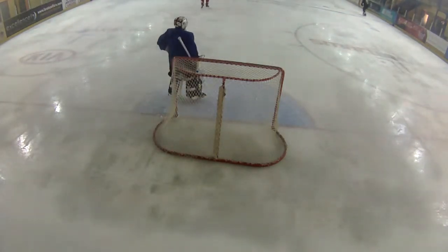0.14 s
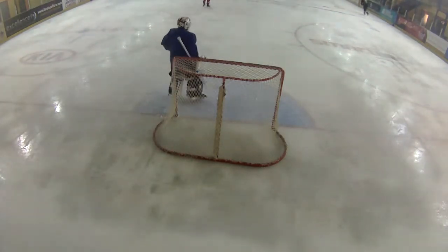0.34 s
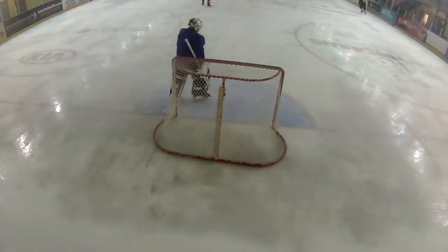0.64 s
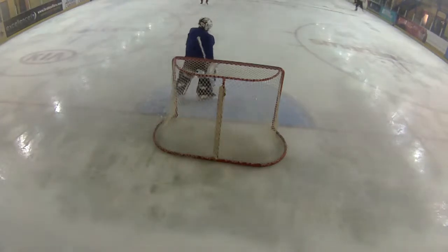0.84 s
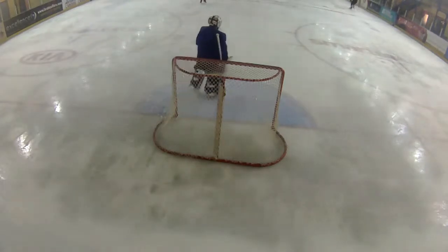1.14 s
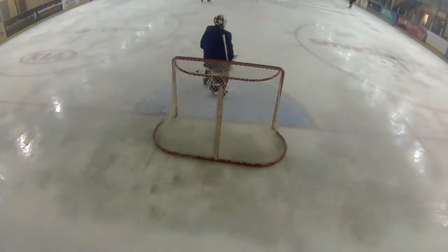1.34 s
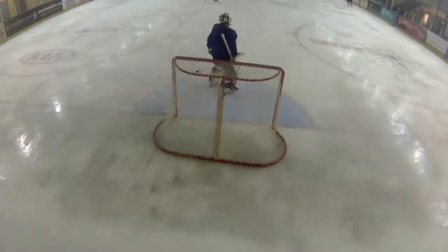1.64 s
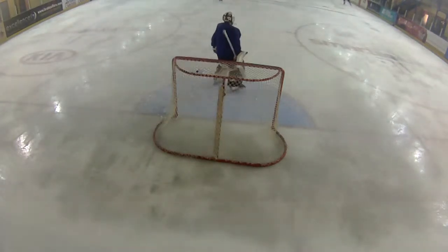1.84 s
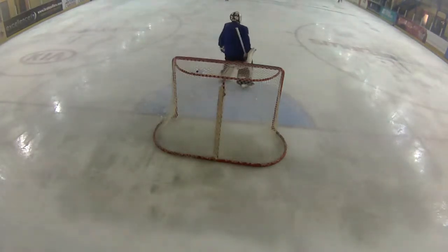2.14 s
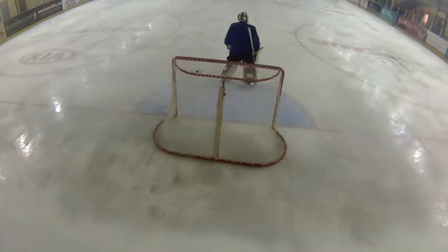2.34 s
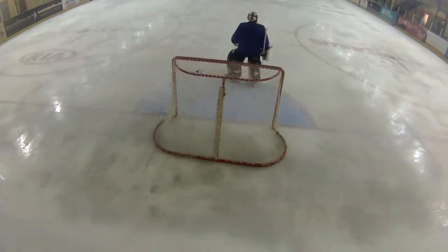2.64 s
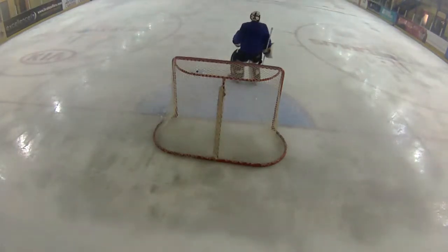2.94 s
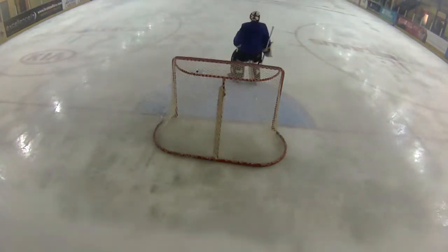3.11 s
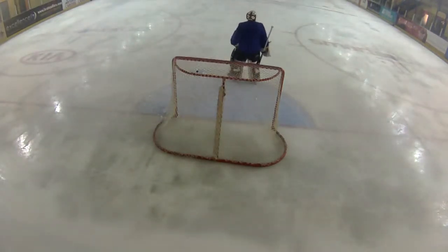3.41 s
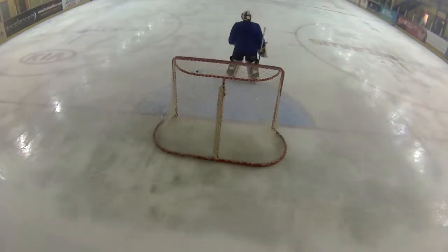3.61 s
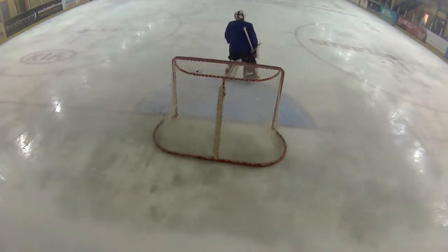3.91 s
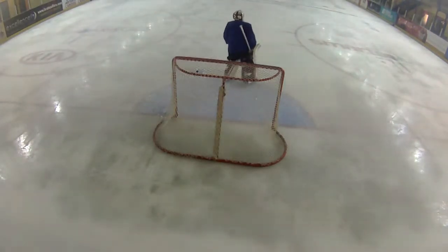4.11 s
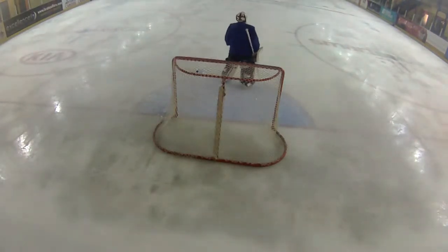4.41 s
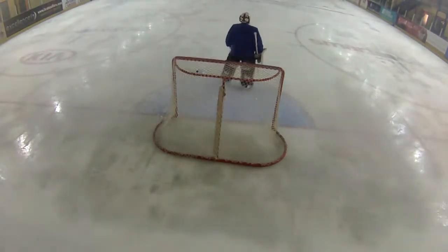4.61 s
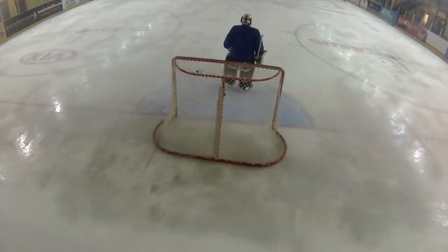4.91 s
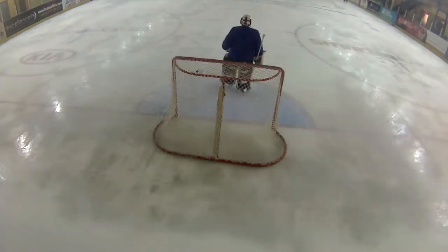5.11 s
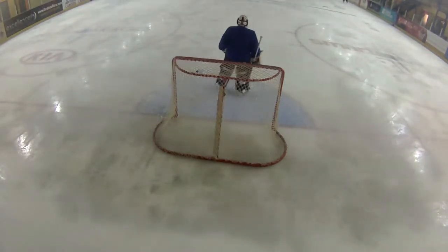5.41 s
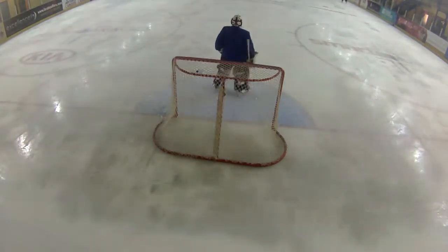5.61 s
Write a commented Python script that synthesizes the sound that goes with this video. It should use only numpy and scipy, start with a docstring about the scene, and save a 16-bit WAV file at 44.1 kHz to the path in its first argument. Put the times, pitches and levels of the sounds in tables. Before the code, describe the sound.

Skate blades scrape and hiss in swelling strokes on rink ice, with clusters of sharp hard clacks echoing over a low ventilation rumble.

```python
"""A first clack rings out over a low rumble and faint skating: hockey practice in an indoor rink.
Blades scrape in swelling strokes made of random ice clicks and noise, split into bands with their own levels.
Sticks, puck and skates clack as cracks plus decaying tones, and the hall rings on after them.
Both pass a sealed plastic case that favours about 2-4 kHz and adds its own resonances.
Filtered noise makes the ventilation and the dull roar of play; sines make a fan drone and a brief hum."""
import sys
import numpy as np
from scipy import signal
from scipy.fft import rfft, irfft
from scipy.io import wavfile
from scipy.ndimage import uniform_filter1d

SR = 44100
rng = np.random.default_rng(int(sys.argv[2]) if len(sys.argv) > 2 else 0)


def persist_wave(psi):
    """Save psi, clipped to +-1, as 16-bit WAV."""
    counts = np.round(np.clip(psi, -1, 1) * 32767).astype(np.int16)
    wavfile.write(sys.argv[1], SR, np.atleast_2d(counts).T)


N = 253575
TIME = np.arange(N) / SR


def from_db(db):
    """Decibels to gain."""
    return 10 ** (np.asarray(db) / 20)


def rms_one(x):
    """Scale to unit power."""
    return x / np.sqrt(np.mean(x ** 2) + 1e-20)


def peak_one(x):
    """Scale to unit peak."""
    return x / np.abs(x).max()


def unit_energy(h):
    """Scale an impulse response so that white noise keeps its power through it."""
    return h / np.sqrt(np.sum(h ** 2))


def band(x, low_hz, high_hz, order=6):
    """Band-pass without phase shift, so that neighbouring bands add up evenly."""
    sections = signal.butter(order, [low_hz, high_hz], "band", fs=SR, output="sos")
    return signal.sosfiltfilt(sections, x)


def drift(rate_hz):
    """Smooth random curve of spread 1 that moves mostly slower than rate_hz."""
    hz = np.fft.rfftfreq(N, 1 / SR)
    spectrum = rfft(rng.standard_normal(N)) / (1 + (hz / rate_hz) ** 2)
    return rms_one(irfft(spectrum, N))


def response(points, modes=(), size=8192):
    """Causal impulse response of unit energy from a spectrum with resonances on top."""
    hz = np.fft.rfftfreq(size, 1 / SR) + 1  # the offset avoids log(0)
    point_hz, point_db = np.transpose(points)
    db = np.interp(np.log(hz), np.log(point_hz), point_db)
    for centre_hz, width_hz, boost_db in modes:
        db = db + boost_db / (1 + (2 * (hz - centre_hz) / width_hz) ** 2)
    # folding the cepstrum onto positive times gives minimum phase: no sound before its cause
    cepstrum = irfft(np.log(from_db(db)))
    index = np.arange(size)
    positive = (index > 0) & (index < size // 2)
    return unit_energy(irfft(np.exp(rfft(2 * cepstrum * positive))))


def through(x, h):
    """Filter by an impulse response, keeping the length."""
    return signal.fftconvolve(x, h)[:len(x)]


def tone(hz, waver_rad):
    """A sine of unit power whose phase wanders by about waver_rad."""
    return np.sqrt(2) * np.sin(2 * np.pi * hz * TIME + waver_rad * drift(3.5))


def swell(start_s, attack_s, hold_s, release_db_per_s):
    """Gain that rises, holds and dies away."""
    t = TIME - start_s
    rise = np.clip(t / attack_s, 0, 1)
    return rise * from_db(-release_db_per_s * np.maximum(t - attack_s - hold_s, 0))


# Colour of the ventilation, also used for the low noise of the channels.
# Each row: frequency in Hz, relative density in dB per Hz.
VENT_COLOUR = [(10, 5), (25, -5.5), (40, -3.5), (60, -8), (100, -9.5), (200, -14), (400, -18.5), (800, -26),
               (2000, -55)]


def ventilation(level_db=-55.5):
    """Turbulent air rumbles steadily: noise filtered to a low, dark colour."""
    return from_db(level_db) * rms_one(through(rng.standard_normal(N), response(VENT_COLOUR)))


# Slow fades of the ventilation's deep drone.
# Each row: time in seconds, level in dB before the drone's overall trim.
FAN_FADES = [(0, -55), (.6, -63), (1.5, -48.5), (2.0, -58.5), (3.1, -63.5), (4.7, -56), (5.2, -53),
             (5.75, -48)]


def fan_drone(hz=29.3, waver_rad=0.8, trim_db=-6.5):
    """The fan is one deep sine with a wandering phase and an uneven level."""
    time_s, level_db = np.transpose(FAN_FADES)
    return from_db(np.interp(TIME, time_s, level_db) + trim_db) * tone(hz, waver_rad)


# A hollow low hum passing through the hall.
# The one row: centre in seconds, time from centre to 1/e of the gain in seconds, pitch in Hz, level in dB.
HALL_HUM = (1.17, .16, 83, -62)


def hum(waver_rad=0.47):
    """A low wavering sine that rises and falls in a bell-shaped swell."""
    centre_s, length_s, hz, level_db = HALL_HUM
    bell = np.exp(-((TIME - centre_s) / length_s) ** 2)
    return from_db(level_db) * bell * tone(hz, waver_rad)


# Colour of the roar of play. Each row: frequency in Hz, relative density in dB per Hz.
ROAR_SPECTRUM = [(80, -8.5), (200, -4.5), (500, -4.5), (800, -4), (1200, -8), (3000, -51)]
# Dull booms of the hall. Each row: start in seconds, level in dB.
HALL_BOOMS = [(0.41, -57), (2.56, -59)]


def roar(steady_db=-66.5, attack_s=0.054, hold_s=0.18, release_db_per_s=14):
    """Dull filtered noise roars steadily, and each boom adds its power to it."""
    power = from_db(steady_db) ** 2
    for start_s, level_db in HALL_BOOMS:
        boom = from_db(level_db) * swell(start_s, attack_s, hold_s, release_db_per_s)
        power = power + boom ** 2
    return np.sqrt(power) * through(rng.standard_normal(N), response(ROAR_SPECTRUM))


def rink(x, build_s=0.14, t60_s=2.8):
    """Reflections from far walls build up slowly and die away over seconds."""
    envelope = (1 - np.exp(-TIME / build_s)) * from_db(-60 * TIME / t60_s)
    return through(x, unit_energy(rng.standard_normal(N) * envelope))


# What the case wall lets through. Each row: frequency in Hz, relative gain in dB.
WALL_GAIN = [(100, -27), (820, -33), (880, -15.5), (1300, -13), (1650, -9), (1900, 1), (2400, 4.5),
             (3000, -2), (3600, -4), (4400, -15.5), (5000, -22), (5800, -33), (6800, -42.5), (7500, -44),
             (16000, -52)]
# Resonances and small dips of the case. Each row: centre in Hz, width in Hz, boost in dB.
CASE_RESONANCES = [(903, 39, 7.5), (1036, 50, 6), (1195, 71, 7.5), (1520, 64, 1.5), (1592, 21, 6.5),
                   (1728, 29, 6.5), (1855, 47, 6.5), (2150, 110, -1.5), (2302, 85, 6.5), (2455, 65, -1.5),
                   (2657, 76, 4.5), (2800, 67, -0.5), (2930, 50, 4.5), (3533, 53, 7.5), (4010, 310, -3.5),
                   (4200, 380, 8), (6540, 320, 6.5)]


def plastic_case():
    """The wall passes mainly the upper middle, and the closed case colours it with its modes."""
    return response(WALL_GAIN, CASE_RESONANCES)


# Sticks, puck and skates striking.
# Each row: time in seconds, peak in dB, pitch in Hz, time for the ring to fall 60 dB in seconds.
BLOWS = [ (0.2511, -29.5, 2460, .006), (0.294, -28, 2490, 0.039), (0.4388, -17, 2700, 0.012),
         (0.4435, -33, 3500, 0.019), (0.459, -24.5, 5070, 0.01), (0.46, -22, 2840, 0.041),
         (0.4833, -23, 2540, .013), (0.485, -22.5, 1890, 0.074), (0.5285, -42, 2670, 0.0045),
         (0.5494, -32, 2570, 0.0039), (0.5810, -20, 2570, .04), (1.4420, -30, 3340, .016),
         (1.4660, -37, 4970, .014), (1.7728, -30.5, 3230, 0.023), (1.807, -36, 3000, 0.0072),
         (1.8300, -36, 5460, .008), (2.4452, -26, 3250, 0.031), (2.5550, -30, 2320, 0.021),
         (2.6023, -19.5, 2390, 0.021), (2.647, -25, 1835, 0.074), (2.7067, -38, 2330, 0.024),
         (3.0639, -35, 2600, .01), (3.602, -33, 2800, .02), (4.6330, -22.5, 2400, 0.041),
         (4.6430, -20.5, 2650, 0.021), (4.6632, -26, 1900, 0.016), (4.6882, -18, 2200, 0.017),
         (4.6945, -17.5, 1850, 0.021), (4.7237, -21.5, 3760, .012), (4.7325, -18.5, 2330, 0.0086),
         (4.7499, -23, 3100, 0.0062), (4.7642, -20.5, 2150, 0.015), (5.0370, -27.5, 2020, .012),
         (5.1105, -25, 1900, 0.0096), (5.5214, -27, 2330, 0.033), (5.548, -35, 4200, 0.0094),
         (5.557, -33, 6250, 0.011), (5.5800, -26, 2180, .03), (5.6220, -26, 2430, 0.023),
         (5.688, -21, 3400, 0.0083), (5.7170, -23, 4700, .014)]


def clacks(case, crack=1.04, crack_q=2.7, crunch=0.17, crunch_s=0.004, size=8192):
    """Each blow is a crack with a brief crunch of ice, over the decaying ring of the struck thing."""
    out = np.zeros(N + size)
    t = np.arange(size) / SR
    for start_s, peak_db, hz, t60_s in BLOWS:
        grains = rng.standard_normal(size)
        contact = (t == 0) + crunch * grains * np.exp(-t / crunch_s)
        # the crack is tuned broadly to the pitch of the ring
        b, a = signal.iirpeak(hz, crack_q, fs=SR)
        contact = signal.lfilter(b, a, np.diff(contact, prepend=0))
        ring = np.cos(2 * np.pi * hz * t) * from_db(-60 * t / t60_s)
        blow = peak_one(through(ring, case)) + crack * peak_one(through(contact, case))
        start = round(start_s * SR)
        out[start:start + size] += from_db(peak_db) * peak_one(blow)
    return out[:N]


def chips(per_s, spread_db):
    """Ice breaks under the edge in random clicks of uneven size."""
    sizes = from_db(spread_db * np.minimum(rng.exponential(1, N), 3))
    signs = rng.choice([-1, 1], N)
    return rms_one(sizes * signs * (rng.random(N) < per_s / SR))


# A blade bites the ice. Each row: start, attack and hold in seconds, scrape in dB before the blades' trim,
# then coarse flakes, spray and fizz in dB relative to the scrape.
BITES = [ (0.41, 0.077, 0.21, -38, -18.5, -6, -31), (1.725, 0.066, 0.16, -45.5, -14.5, -7, -25.5),
         (2.162, 0.41, 0.1, -35.5, -18.5, -9.5, -28.5), (2.88, 0.088, 0.059, -40, -15, -11, -29.5),
         (3.77, 0.23, 0.6, -46, -12.5, -1, -23.5), (4.154, .15, 0.058, -39, -31, -14, -31),
         (4.629, 0.023, 0.088, -34.5, -12, -7, -29.5), (4.956, 0.064, 0.23, -45, -13.5, -22, -45),
         (5.516, 0.018, 0.57, -41, -17.5, -7.5, -24)]
# Steady scraping from the far end.
# The one row: scrape in dB before the trim, then flakes, spray and fizz in dB relative to it.
FAR_BLADES = (-45.5, -18.5, -8.5, -28.5)


def blade_levels(release_db_per_s=24.5):
    """Gains of flakes, scrape, spray and fizz: the strokes and the far skating add in power."""
    def power(scrape_db, flakes_db, spray_db, fizz_db):
        """Power of the four parts, one a row."""
        return from_db(scrape_db + np.array([[flakes_db], [0], [spray_db], [fizz_db]])) ** 2

    total = power(*FAR_BLADES)
    for start_s, attack_s, hold_s, *colour in BITES:
        total = total + power(*colour) * swell(start_s, attack_s, hold_s, release_db_per_s) ** 2
    return np.sqrt(total)


def skates(case, chatter_db=0.5, chatter_hz=60, lean_db=0.5, lean_hz=9, wash_db=2.5, trim_db=-0.5,
           sheet_db=-58.5, sheet_follows=0.81):
    """Chattering blades chip the ice, within a smooth noise wash that stands for the hall's smear."""
    flakes, scrape, spray, fizz = from_db(trim_db) * blade_levels()
    # the sheet rumbles at sheet_db for a mean scrape and follows a share of its swing in dB
    hollow = from_db(sheet_db) * (scrape / scrape.mean()) ** sheet_follows
    near = rms_one(chips(per_s=1600, spread_db=0.5) * from_db(chatter_db * drift(chatter_hz)))
    wash = from_db(wash_db) * rng.standard_normal(N)
    grit = through(near + wash, case)
    grit = grit * from_db(lean_db * drift(lean_hz))  # the skater's weight shifts on the edge
    # from low to high: hollow ice sheet, coarse flakes, scrape, spray, fine fizz
    edges_hz = [700, 1350, 1700, 3100, 5000, 16000]
    gains = [hollow, flakes, scrape, spray, fizz]
    return sum(gain * rms_one(band(grit, low_hz, high_hz))
               for low_hz, high_hz, gain in zip(edges_hz, edges_hz[1:], gains))


def scene(echo_db=-5.5):
    """Hall noise, clacks with their echo, and skates meet in one signal, sent to both channels."""
    case = plastic_case()
    hall = ventilation() + fan_drone() + hum() + roar()
    blows = clacks(case)
    echo = from_db(echo_db) * rink(blows)
    mono = hall + echo + blows + skates(case)
    return np.stack([mono, mono])


def record(dry, hiss_db=-69, swell_db=-32.0, low_noise_db=-73.5, cutoff_hz=15800, size=128):
    """Each channel adds its own faint low noise and a high hiss that swells with the sound; the top is cut."""
    white = rng.standard_normal(dry.shape)
    power = np.abs(uniform_filter1d(dry ** 2, size))  # smoothed over size samples
    # the hiss levels are those of the white noise before its band is cut out
    hiss_gain = np.sqrt(from_db(hiss_db) ** 2 + from_db(swell_db) ** 2 * power)
    hiss = band(white, 4500, 20000) * hiss_gain
    rumble = np.array([through(w, response(VENT_COLOUR)) for w in white])
    low_noise = from_db(low_noise_db) * rms_one(rumble)
    top_cut = signal.ellip(12, .1, 80, cutoff_hz, fs=SR, output="sos")
    return signal.sosfilt(top_cut, dry + hiss + low_noise)


dry = scene()
out = record(dry)
persist_wave(out)
```